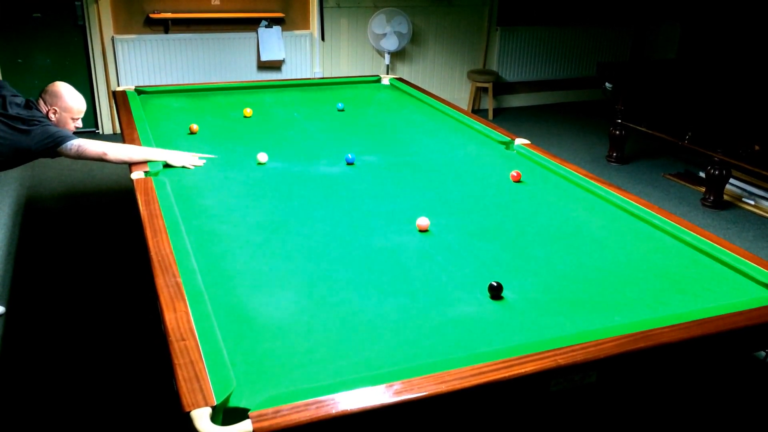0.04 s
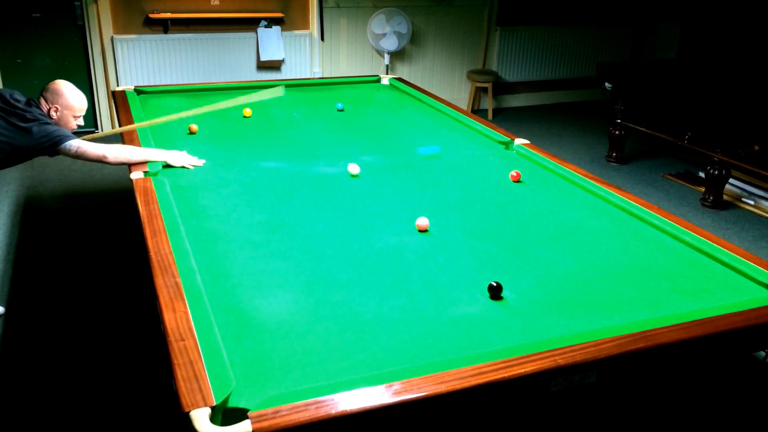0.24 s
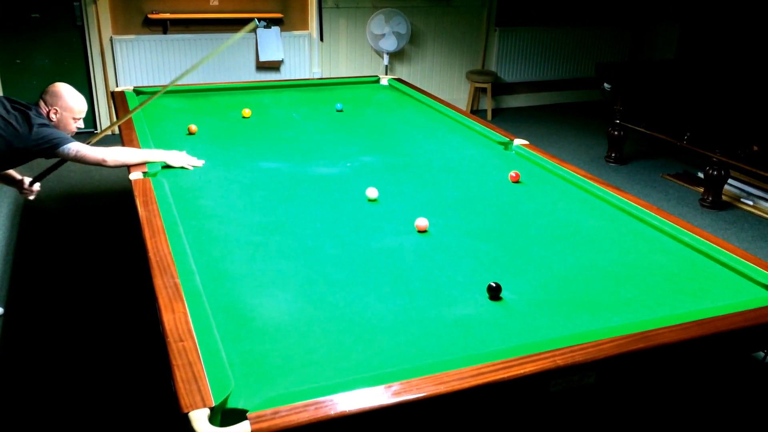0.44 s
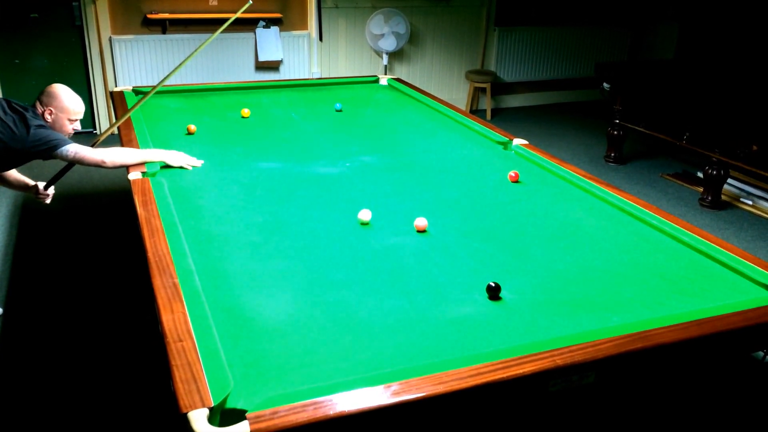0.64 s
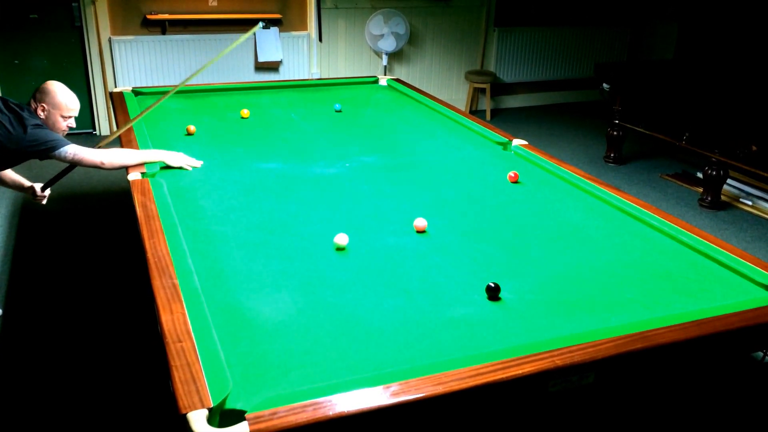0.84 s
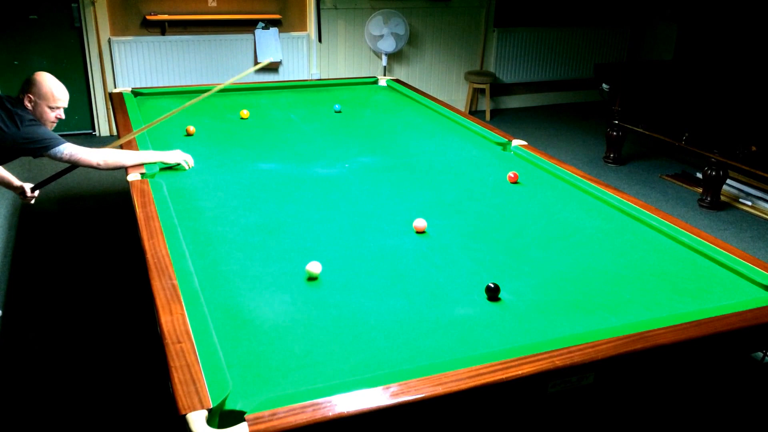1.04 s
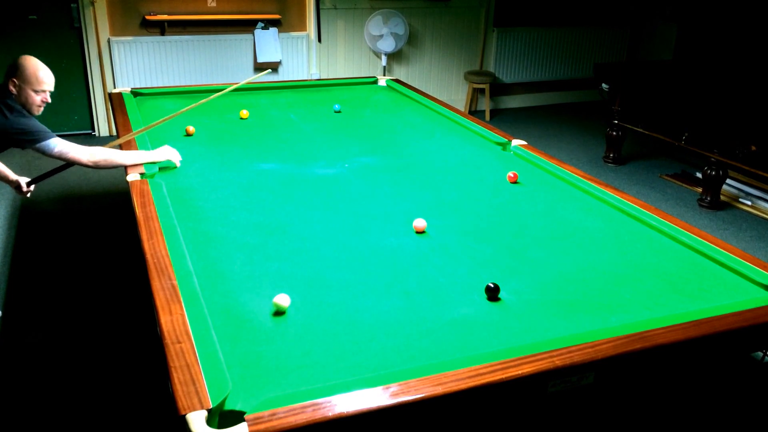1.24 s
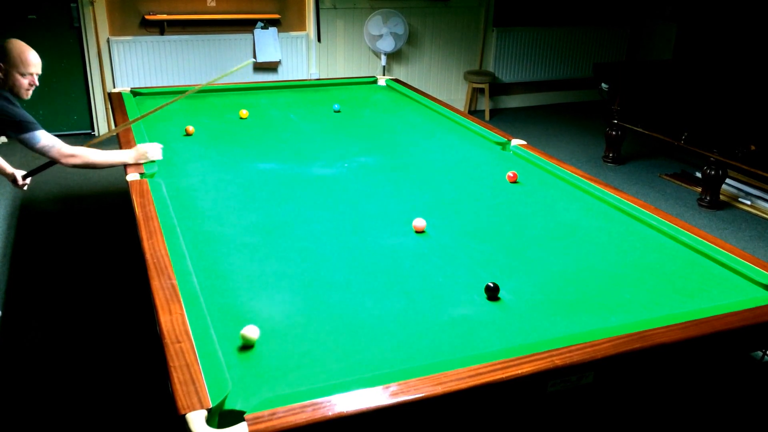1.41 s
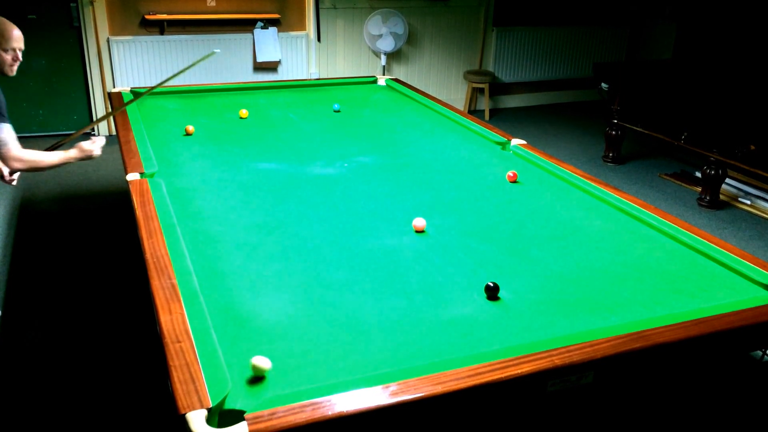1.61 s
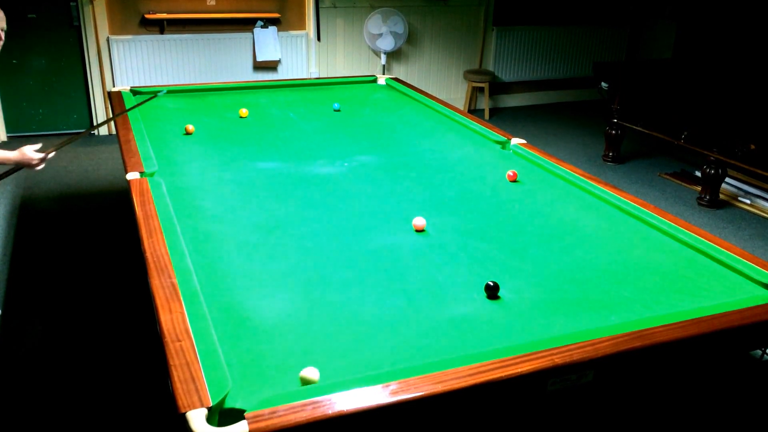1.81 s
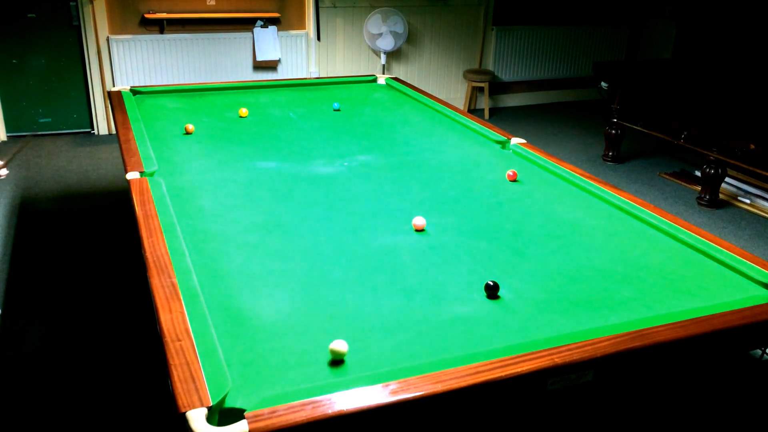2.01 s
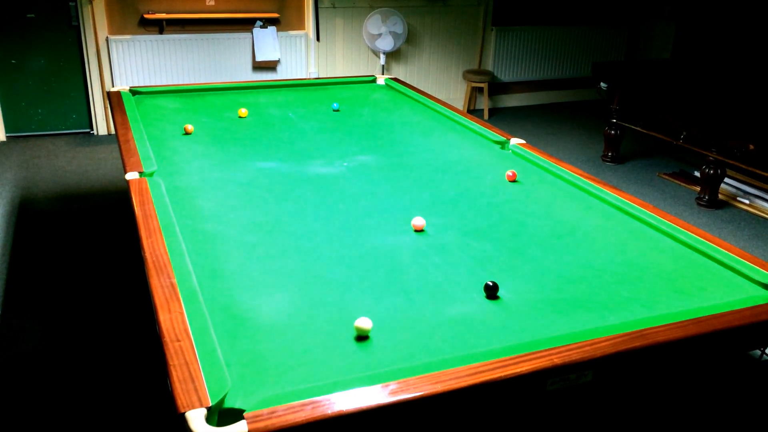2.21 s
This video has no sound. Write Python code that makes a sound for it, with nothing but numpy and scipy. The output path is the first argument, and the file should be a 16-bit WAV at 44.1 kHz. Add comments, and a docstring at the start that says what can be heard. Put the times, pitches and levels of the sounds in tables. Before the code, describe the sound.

A hard snooker shot: sharp ball clack and a slam into the pocket, in an echoing hall.

```python
"""A hard snooker shot in a quiet, echoing hall that hums faintly throughout.
First the cue knocks the white ball and its wooden shaft rings. The white clacks on the blue,
which slams into a far pocket and sets the table ringing. The blue drops on the wire rail
and taps a ball lying there. Last, a hand slides off the cloth and the white rolls on."""
import sys
import numpy as np
from scipy import signal
from scipy.fft import rfft, irfft
from scipy.io import wavfile

SR = 44100
rng = np.random.default_rng(int(sys.argv[2]) if len(sys.argv) > 2 else 0)


def dump_mix(stems):
    """Bounce the given channels to the path in sys.argv[1] as a 16-bit WAV at rate SR."""
    frames = np.atleast_2d(stems).T  # one column per channel
    limited = np.clip(frames, -1, 1)  # hard clip at full scale
    pcm = np.round(limited * 32767).astype(np.int16)
    wavfile.write(sys.argv[1], SR, pcm)


N = 103635
T = np.arange(N) / SR


def amp(db):
    """Turns decibels into a volume multiplier."""
    return 10 ** (np.asarray(db) / 20)

def unit(x):
    """Scales a sound to energy 1, so the levels that shaped it only set its balance."""
    return x / np.sqrt(np.sum(x ** 2) + 1e-20)

def read(points, hz):
    """Looks up a table at any pitch, sliding smoothly between its rows."""
    pitches, values = np.transpose(points)
    return np.interp(np.log(hz + 1), np.log(pitches + 1), values)

def delayed(x, s):
    """The sound x, starting s seconds later."""
    return np.concatenate([np.zeros(max(round(s * SR), 0)), x])[:N]

def colour(x, spectrum, tilt_db=0, size=4096):
    """Gives x the tone of a table, at energy 1; a positive tilt_db (per octave) brightens it."""
    hz = np.fft.rfftfreq(size, 1 / SR)
    octaves = np.log2(np.clip(hz, 300, 4000) / 1000)
    cepstrum = irfft(np.log(amp(read(spectrum, hz) + tilt_db * octaves)))
    # fold the filter so that nothing sounds before the hit
    cepstrum[1:size // 2] *= 2
    cepstrum[size // 2 + 1:] = 0
    response = irfft(np.exp(rfft(cepstrum)))
    return unit(signal.fftconvolve(x, response)[:N])

def click(spectrum, tilt_db=0):
    """One sharp click with the tone of a table."""
    return colour(signal.unit_impulse(N), spectrum, tilt_db)

def burst(decay_s, rise_s):
    """A short puff of noise, as when two things touch."""
    return rng.choice([-1., 1.], N) * (1 - np.exp(-T / rise_s)) * np.exp(-T / decay_s)

def steady(spectrum):
    """Even noise with the tone of a table, at an average (rms) strength of 1."""
    hz = np.fft.rfftfreq(N, 1 / SR)
    shaped = rfft(rng.standard_normal(N)) * amp(read(spectrum, hz))
    return unit(irfft(shaped, N)) * np.sqrt(N)

def ring(notes, rise_s):
    """A struck object's notes swell, then each fades 60 dB in its ring_s; no deep bass, energy 1."""
    sines = sum(amp(db) * np.exp(-np.log(1000) * T / ring_s) * np.sin(2 * np.pi * hz * T)
                for hz, db, ring_s in notes)
    low_cut = signal.butter(3, 190, "high", fs=SR, output="sos")
    return unit(signal.sosfilt(low_cut, (1 - np.exp(-T / rise_s)) * sines))

def echoed(x, echoes):
    """The sound itself plus its first echoes."""
    return x + sum(amp(db) * delayed(x, s) for s, db in echoes)


# how long the hall takes to fade by 60 dB: pitch_hz, ring_s
HALL_FADE = [(80, 0.35), (220, 0.87), (340, 1.41), (600, .98), (1300, 0.84), (2500, 0.59), (4000, 0.56),
             (6500, .48), (10000, .36), (15000, 0.31)]

def hall(x, wet_db, build_s):
    """Countless echoes blur into a tail that builds up, then fades at its own speed for each pitch."""
    hz, t, noise = signal.stft(rng.choice([-1., 1.], N), SR, nperseg=256)
    fade = np.exp(-np.log(1000) * t / read(HALL_FADE, hz)[:, None])
    tail = signal.istft(noise * fade, SR, nperseg=256)[1][:N]
    swell = 1 - np.exp(-T / build_s)
    return amp(wet_db) * signal.fftconvolve(x, unit(tail * swell))[:N]


# tone of the air: pitch_hz, level_db
AIR_TONE = [(15, -35), (30, -21.5), (60, -8.5), (115, -3), (170, -9), (260, -17), (450, -20.5), (700, -24),
            (1400, -27.5), (1950, -28), (2400, -35.5), (4400, -41.5), (8000, -46), (15000, -50.5)]
# notes of the hum: pitch_hz, level_db
HUM_NOTES = [(75.4, -72), (113.5, -62.5), (200, -68.5)]

def room_tone():
    """Soft air noise and a low, wavering hum."""
    hum = 0
    for hz, db in HUM_NOTES:
        waver = .6 * steady([(1, 0), (5, -4), (15, -30), (60, -90)])
        hum += amp(db) * np.sqrt(2) * np.sin(2 * np.pi * hz * T + waver)
    return amp(-58) * steady(AIR_TONE) + hum


# hiss of skin on cloth: pitch_hz, level_db
CLOTH_TONE = [(500, -6), (2000, -1.5), (4500, -2), (7500, -0.5), (11000, -5), (14500, -3.5)]

def hand_slide(peak_s=1.482, rise_s=.24, fall_s=.09):
    """The hand that steadied the cue rubs the cloth as it slides away."""
    width_s = np.where(T < peak_s, rise_s, fall_s)
    swell = np.exp(-((T - peak_s) / width_s) ** 2)
    return amp(-71.5) * swell * steady(CLOTH_TONE)


# rumble of a rolling ball: pitch_hz, level_db
ROLL_TONE = [(60, -1), (190, 4.5), (300, 6.5), (600, -9), (1800, -23), (3000, -43), (8000, -29)]

def white_roll(peak_s=1.905, width_s=.35):
    """The white rolls nearer; its faint rumble swells and fades."""
    swell = np.exp(-((T - peak_s) / width_s) ** 2)
    return amp(-67) * swell * steady(ROLL_TONE)


# balls bump the slate, rail and cushion: start_s, level_db, decay_s, tilt_db_per_octave
BUMP_HITS = [(.235, -8, 0.07, -1.5), (0.357, -9, 0.01, 5.5), (.43, -12, .02, -4), (.53, -5.5, .09, 0),
             (1.03, -22, 0.086, -13), (1.611, -24, 0.059, -12.5)]
# dull tone of a bump: pitch_hz, level_db
BUMP_TONE = [(30, -25), (60, -12.5), (95, -8.5), (135, 1.5), (220, -0.5), (310, -3), (450, -13), (800, -26),
             (1500, -40), (6000, -72)]

def table_bumps():
    """Rolling and hopping balls make the heavy table boom softly."""
    booms = sum(delayed(amp(db) * colour(burst(decay_s, rise_s=.0085), BUMP_TONE, tilt_db), s)
                for s, db, decay_s, tilt_db in BUMP_HITS)
    return booms + hall(booms, wet_db=-6, build_s=.015)


# tick of the wire rail: pitch_hz, level_db
RAIL_TONE = [(100, -23), (330, 4.5), (600, 1.5), (1100, 0), (2000, 6.5), (2800, -4.5), (4000, -1.5),
             (6200, -3), (7500, -6.5), (9000, -10), (11000, -18), (15000, -17)]

def rail_tick(start_s=1.0115):
    """The blue lands on the wire rail under the pocket, heard mostly through the hall."""
    tick = amp(-35) * colour(burst(decay_s=.0021, rise_s=.0012), RAIL_TONE)
    wire = amp(-31.5) * ring([(5600, -2, .033), (6270, 0, .032)], rise_s=.0012)
    tail = hall(click(RAIL_TONE), wet_db=-18.5, build_s=.016)
    return delayed(tick + wire + tail, start_s)


# muffled tap under the table: pitch_hz, level_db
TAP_TONE = [(150, -10), (500, -17), (1100, -4), (1800, 3), (2400, 1), (3200, 0.5), (4000, -18), (6000, -37),
            (10000, -32), (15000, -36)]

def ball_tap(start_s=1.111):
    """The blue taps a ball lying on the rail; the echoes are louder than the tap itself."""
    tap = amp(-26) * colour(burst(decay_s=.0067, rise_s=.0028), TAP_TONE)
    tail = hall(click(TAP_TONE), wet_db=-16, build_s=.012)
    return delayed(echoed(tap, [(.018, 5.6), (.033, 2.6)]) + tail, start_s)


# touches on the pocket's iron rim: start_s, level_db
RIM_HITS = [(0.4878, -20.5), (.5165, -16.5)]
# their bright tone: pitch_hz, level_db
RIM_TONE = [(1000, -21.5), (4500, -0.5), (8000, -5), (11500, -5.5), (13500, -12), (15000, -29.5)]

def rim_ticks():
    """The blue glances off the metal rim of the pocket."""
    return sum(delayed(amp(db) * colour(burst(decay_s=.0015, rise_s=.0003), RIM_TONE), s)
               for s, db in RIM_HITS)


# notes of the wooden shaft: pitch_hz, level_db, ring_s
SHAFT_NOTES = [(231, -21, 0.54), (400, -15, 0.08), (730, -16, .06), (905, -12, 0.088), (1132, 3.5, 0.049),
               (1375, -8, 0.13), (1657, -1.5, 0.077), (1778, -3, 0.073), (2390, -5, .06), (2722, -10, .04),
               (2925, -1.5, .04), (3296, -6.5, 0.055), (4180, -13.5, .03), (4400, -14, .03)]
# scuff of the tip: pitch_hz, level_db
TIP_TONE = [(80, -17.5), (250, -11), (420, -4.5), (560, -7.5), (850, -7), (1200, 2), (3000, -2.5),
            (4500, -8), (6200, -14), (7800, -18.5), (9500, -32.5), (15000, -29.5)]
# echoes of the blow: delay_s, level_db
BLOW_ECHOES = [(0.0215, 1), (0.035, -3)]

def cue_strike(start_s=.2207):
    """The cue's tip scuffs the white and the wooden shaft rings."""
    shaft = amp(4) * ring(SHAFT_NOTES, rise_s=.0033)
    tip = amp(-1.5) * colour(burst(decay_s=.006, rise_s=.00035), TIP_TONE)
    shaft_tail = hall(shaft, wet_db=-2.5, build_s=.025)
    tip_tail = hall(click(TIP_TONE, tilt_db=-1), wet_db=1, build_s=.0067)
    return delayed(echoed(shaft + tip, BLOW_ECHOES) + shaft_tail + tip_tail, start_s)


# notes of ball knocking on ball: pitch_hz, level_db, ring_s
KNOCK_NOTES = [(1750, -9, .018), (2378, -7, 0.031), (2790, 4, 0.0053), (2920, -7.5, .012),
               (3314, -16.5, 0.0048), (4250, -14.5, 0.014)]
# high ping of the balls: pitch_hz, level_db
PING_TONE = [(3000, -30), (6000, -14), (8500, -10), (9600, -16), (10700, -1), (12300, -3.5), (13000, -14),
             (14000, -1), (15000, 1)]
# echoes of each off the table, ceiling and walls: delay_s, level_db
KNOCK_BOUNCES = [(.0015, -6.5), (.0042, -6), (.012, -13), (.0222, -4.5), (.0234, -6.5), (.027, -8),
                 (.0308, -8.5), (.033, -1), (0.0343, -8), (.0372, -7), (.0418, -6)]
PING_BOUNCES = [(.0018, 0.5), (.0205, -11), (.022, -10.5), (.0242, -5), (.026, -9)]
# tone of each as the hall returns it: pitch_hz, level_db
KNOCK_HALL_TONE = [(100, -29), (300, -16), (700, -14), (1200, -10.5), (1700, -0.5), (2500, -2),
                   (3300, -5.5), (4400, -17), (5500, -39), (7000, -43), (9500, -45), (15000, -43)]
PING_HALL_TONE = [(3000, -40.5), (9500, -18.5), (10700, -8), (12400, -6), (13000, -16), (14000, -4),
                  (15000, 6)]

def ball_clack(start_s=.2862, top_hz=6240):
    """The white hits the blue: a very short knock and a high ping, thrown back by the room."""
    contact = signal.butter(3, top_hz, fs=SR, output="sos")  # the time in contact limits the treble
    knock = amp(8) * signal.sosfilt(contact, ring(KNOCK_NOTES, rise_s=.00022))
    ping = amp(-11) * click(PING_TONE)
    early = echoed(knock, KNOCK_BOUNCES) + echoed(ping, PING_BOUNCES)
    knock_tail = hall(click(KNOCK_HALL_TONE), wet_db=11, build_s=.013)
    ping_tail = hall(click(PING_HALL_TONE), wet_db=-14, build_s=.004)
    return delayed(early + knock_tail + ping_tail, start_s)


# notes of the table's frame: pitch_hz, level_db, ring_s
FRAME_NOTES = [(239, -9, .55), (273.5, -8, .8), (323, -2.5, 1.1), (327.4, 0, 1.3), (374.6, -7, 1.2),
               (408.2, 3, 1.2), (421, -7, 0.9), (480, -10, .9), (629, 0, .9), (765, -6, .8), (812, -7, .85),
               (884, -6.5, .85), (951, -4, 0.75), (1045, -1.5, 0.38), (1320, -3.5, .6), (1460, -6.5, 0.53),
               (1946, -3, .45)]

def frame_ring(start_s=.4875):
    """The slam in the pocket leaves the table's frame ringing."""
    return delayed(amp(14) * ring(FRAME_NOTES, rise_s=.018), start_s)


# low notes of the pocket's leather: pitch_hz, level_db, ring_s
LEATHER_NOTES = [(441, 1.5, 0.064), (590, -7.5, .02), (760, 1.5, .03), (960, 0.5, .035)]

def leather_thud(start_s=.4868):
    """The blue pushes into the leather with a short thud."""
    return delayed(amp(15) * ring(LEATHER_NOTES, rise_s=.0014), start_s)


# hits on the pocket's mouth, back and iron: start_s, relative_level_db, decay_s, tilt_db_per_octave
RATTLE_HITS = [(0.4821, 8, 0.013, -1), (0.4869, 13.5, 0.015, 0), (0.4963, 13.5, 0.0081, -2),
               (0.5071, 9.5, 0.0034, 3), (0.5151, 14, 0.018, 1), (.531, 15.5, 0.0036, -4.5),
               (.554, 0.5, 0.0029, -3.5)]
# tone of those hits: pitch_hz, level_db
RATTLE_TONE = [(60, -46.5), (150, -30.5), (240, -9.5), (340, -1), (450, -3), (560, -4.5), (900, -3.5),
               (1200, -8), (1900, -7), (3200, -18), (5000, -27), (7000, -36.5), (10000, -41.5),
               (14500, -60)]

def pocket_rattle(tail_start_s=.493):
    """The blue slams into the pocket and rattles between its sides, and the hall answers."""
    hits = sum(delayed(amp(db) * colour(burst(decay_s, rise_s=.0013), RATTLE_TONE, tilt_db), s)
               for s, db, decay_s, tilt_db in RATTLE_HITS)
    tail = hall(click(RATTLE_TONE, tilt_db=.13), wet_db=14.5, build_s=.015)
    return amp(-4) * hits + delayed(tail, tail_start_s)


def scene():
    """Adds up the whole shot in one channel."""
    shot = cue_strike() + ball_clack()
    pocket = pocket_rattle() + leather_thud() + frame_ring() + rim_ticks()
    afterwards = rail_tick() + ball_tap() + hand_slide() + white_roll()
    return (shot + pocket + afterwards + table_bumps() + room_tone())[None]

def record(dry):
    """Cuts away the very highest treble."""
    top_hz = 15300
    treble_cut = signal.firwin(401, top_hz, window=("kaiser", 9), fs=SR)
    return signal.oaconvolve(dry, treble_cut[None], "same")


dry = scene()
out = record(dry)
dump_mix(out)
```